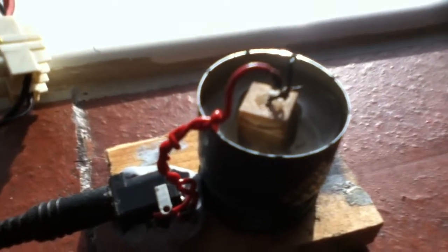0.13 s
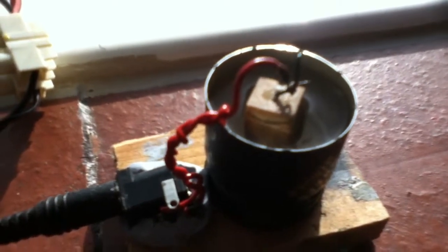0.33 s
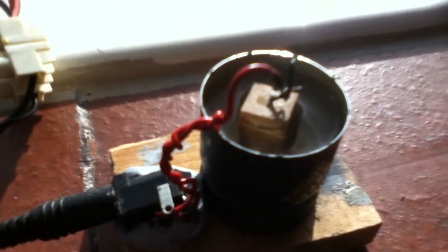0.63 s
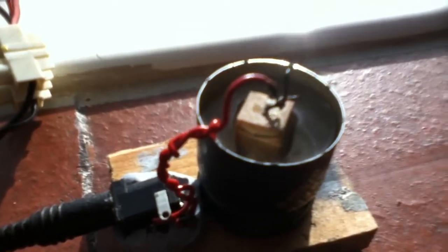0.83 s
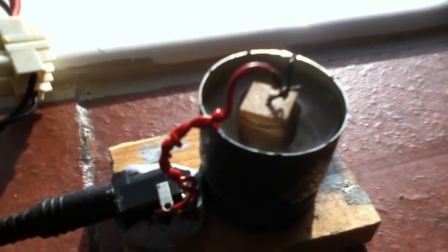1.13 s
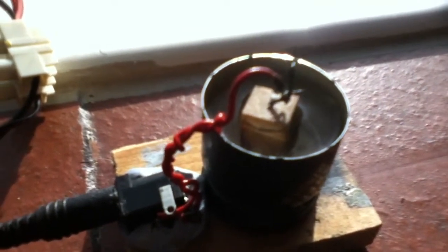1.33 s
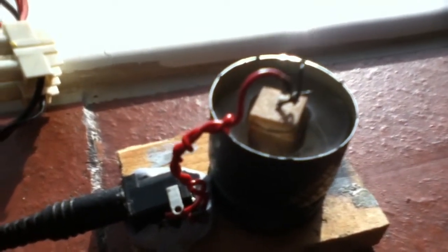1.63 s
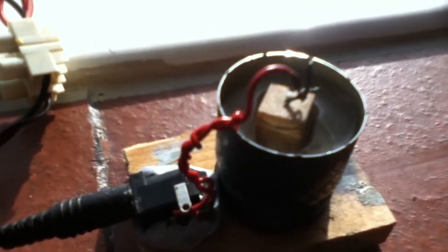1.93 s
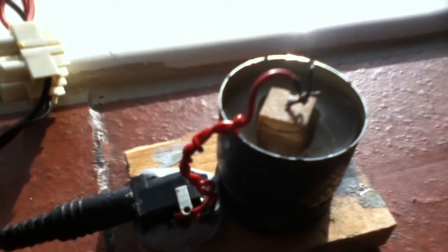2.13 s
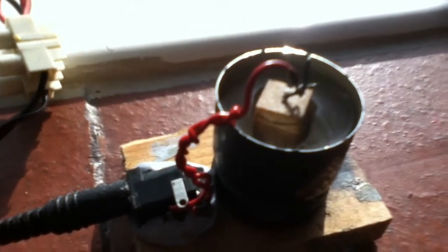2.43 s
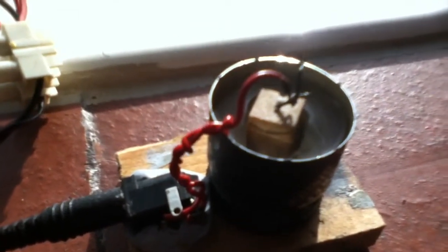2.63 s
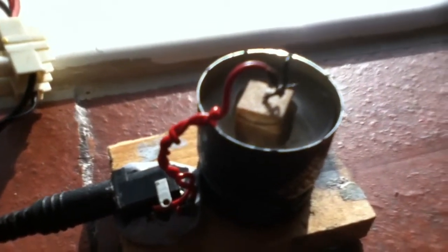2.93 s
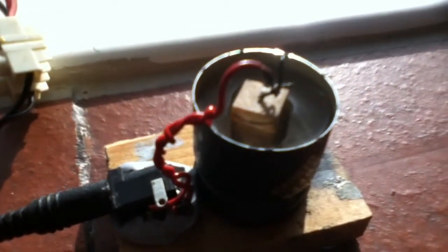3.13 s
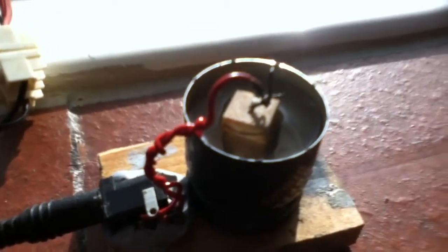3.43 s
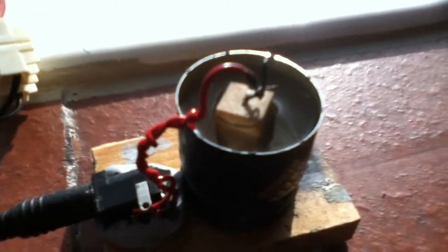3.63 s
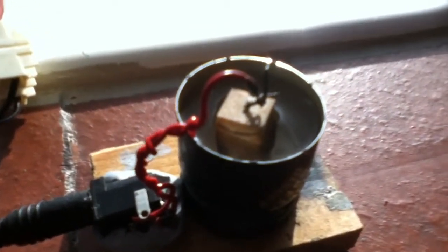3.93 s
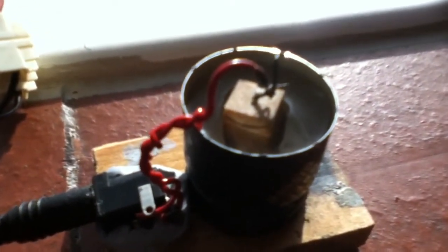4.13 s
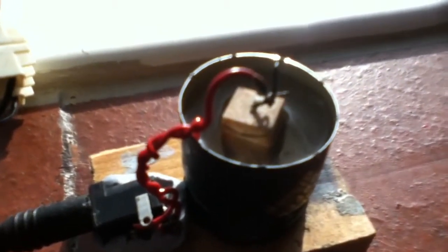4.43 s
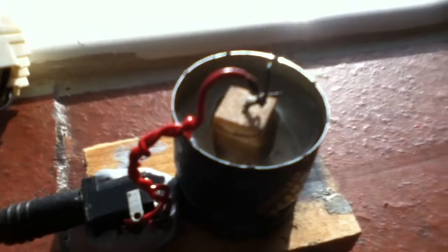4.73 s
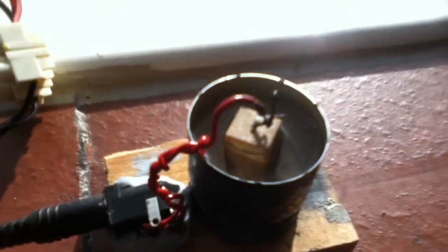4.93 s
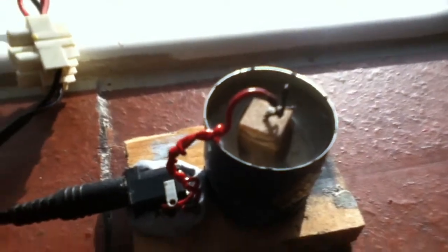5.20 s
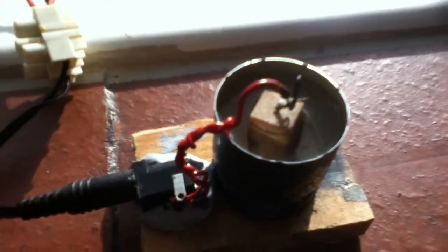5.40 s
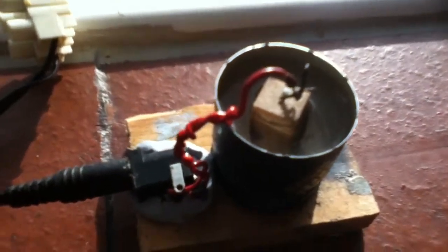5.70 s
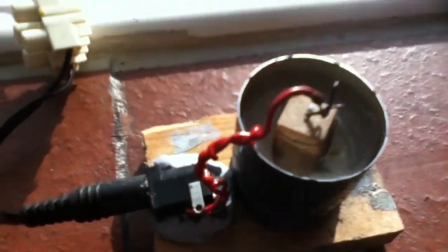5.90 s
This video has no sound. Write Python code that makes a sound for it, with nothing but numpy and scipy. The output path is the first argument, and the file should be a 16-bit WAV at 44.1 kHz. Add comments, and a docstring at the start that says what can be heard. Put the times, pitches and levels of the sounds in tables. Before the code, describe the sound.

Continuous hard boiling in a little metal cup: sizzling, spattering hiss, bright and nearly steady, strongest at the start. Bubbles snap quickly at first, then the crackle stops and unsteady steam whistles emerge, one rough and piercing, another much higher and slowly climbing. Late on they give way to breathy hiss, a brief swooping squeal and soft knocks on the wooden base. Close handheld microphone, short indoor reflections, very quiet low room murmur.

```python
"""Water boils hard around a wired heater in a small metal cup on a window sill, heard from close by.
Dense trains of tiny clicks, one per collapsing steam bubble, ring in the cup and make hiss, spatter and fizz.
Larger bubbles crackle and pop. Steam from narrow gaps sings in whistles and hiss: gliding tones in breathy noise.
Dull knocks ring the wooden base; soft low bumps, gurgles and handling rustle are swells of narrow noise.
The room rumbles faintly below."""
import sys
import numpy as np
from scipy import signal
from scipy.fft import rfft, irfft, next_fast_len
from scipy.io import wavfile
from scipy.ndimage import map_coordinates

SR = 44100
rng = np.random.default_rng(int(sys.argv[2]) if len(sys.argv) > 2 else 0)


def generate_wav(sig):
    """Save sig (samples, or channels by samples) to the path in sys.argv[1] as 16-bit PCM at SR."""
    pcm = np.round(np.clip(np.atleast_2d(sig).T, -1, 1) * 32767).astype(np.int16)
    wavfile.write(sys.argv[1], SR, pcm)


N = 267201
TIME, BINS = np.arange(N) / SR, np.fft.rfftfreq(N, 1 / SR)  # seconds, hertz

# How hard the water boils; only the height above CALM_DB counts. Each row: time in seconds, vigour in dB.
BOIL_VIGOUR = [(0, -58), (0.6, -60), (0.92, -61.5), (1.18, -62.5), (1.8, -62), (2.4, -62.5), (3.7, -61.5),
               (4.7, -60), (6.0, -60)]
CALM_DB = -63
# Brief surges of bubbling, negative for a slackening. Each row: start in seconds, length in seconds, change in dB.
BOIL_SURGES = [(.42, 0.14, 1.5), (.84, 0.12, 1), (1.5, 0.64, 0.5), (2.6, 0.34, 1), (3.36, 0.22, 0.2),
               (4.3, 0.45, 0.4), (5.06, 0.24, -1.8), (5.24, 0.14, 0), (5.72, 0.77, 0.9)]
# Resonances of the cup and its water. Each row: pitch in hertz, nominal width in hertz, relative level in dB.
CUP_RESONANCES = [(1425, 210, -18), (1744, 144, -13.5), (2096, 53, -17), (2516, 61, -15.5),
                  (2870, 260, -16.5), (3174, 61, -9), (3630, 145, -2.5), (3770, 150, -0.5),
                  (4076, 250, 1.5), (4420, 520, -0.5), (4960, 220, -1.5), (5230, 220, -3.5)]
# The sloshing water bends them: typical bend as a share of their pitch, and changes per second.
SLOSH, SLOSH_PER_S = 0.008, 3
# Colours of steam hiss, spatter and fizz. Each row: frequency in hertz, relative level in dB per hertz.
STEAM_COLOUR = [(3400.0, -45), (4800.0, -10), (5550.0, -3.5), (5900.0, -4.5), (6200.0, -0.5), (6550.0, -1),
                (7150.0, -0.5), (7600.0, -7.5), (8100.0, -3), (8550.0, -12.5), (10000.0, -5.5),
                (13000.0, -28.5)]
SPATTER_COLOUR = [(200.0, -10), (600.0, -6), (950.0, -5), (1300.0, -2.5), (1620.0, -3.5), (1950.0, -3.5),
                  (2330.0, -5.5), (2650.0, 1.5), (3400.0, -2.5), (5500.0, 1), (8800.0, 5.5), (11500.0, -1),
                  (13000.0, 1), (15000.0, -10.5)]
FIZZ_COLOUR = [(7000.0, -24), (9100.0, -25), (9900.0, -4.5), (10600.0, -1.5), (10950.0, 0.5), (11400.0, 2),
               (12100.0, 3), (12700.0, -4.5), (13500.0, -10), (15000.0, -15)]
# The steam hiss chokes for a moment. Each row: start in seconds, length in seconds, change in dB.
STEAM_CHOKES = [(2.44, 0.2, -3), (3.68, 0.32, -1)]
# The fizz thins towards the end. Each row: start in seconds, length in seconds, change in dB.
FIZZ_THINNING = [(5.0, 1.4, -1)]

# Colours of the crackle and of a single pop. Each row: frequency in hertz, relative level in dB per hertz.
CRACKLE_SPECTRUM = [(500, -37), (1200, -2), (1800, -14), (2400, -0.5), (4000, 1), (6500, 2.5), (8400, 10.5),
                    (11500, -9), (13200, 5), (15000, 5)]
POP_SPECTRUM = [(1500, -19), (3000, 1), (4200, 0), (8500, 0), (12500, -7), (15000, -14)]
# The loudest single pops. Each row: time in seconds, peak level in dB.
LOUD_POPS = [(.0372, -27), (.0449, -25), (.0555, -32), (.1018, -31), (.1359, -29.5), (.1986, -32),
             (.2375, -32), (.2643, -29.5), (.2836, -31), (.4337, -32), (.4675, -27), (.5332, -32),
             (.6792, -32), (.7597, -29), (.8379, -31), (.9058, -30), (.9187, -30.5), (5.3941, -31)]
# The crackle fades, then stops as the boil settles.
CRACKLE_DB, CRACKLE_FADE_DB_PER_S, CRACKLE_END_S, CRACKLE_RELEASE_S = -44, 1.5, 1.14, 0.2

# The main whistle, rocked by the sloshing water. Each row: time in seconds, pitch in hertz, level in dB.
MAIN_CURVE = [(.45, 5040, -58), (.7, 5120, -50), (.79, 4860, -54), (.86, 5040, -49), (.96, 5150, -54),
              (1.06, 4990, -54), (1.22, 5140, -53.5), (1.55, 5020, -56), (1.83, 5100, -48),
              (1.96, 4920, -50), (2.12, 5100, -50.5), (2.33, 5110, -54), (2.38, 4960, -49),
              (2.5, 4910, -51), (2.6, 5000, -50), (2.75, 5090, -50), (2.95, 5060, -49), (3.12, 4920, -51),
              (3.2, 5070, -51), (3.33, 4910, -49), (3.48, 5040, -48), (3.63, 5000, -59), (3.71, 5100, -51),
              (3.77, 4860, -48.5), (3.88, 5010, -49.5), (4.04, 5050, -49), (4.25, 4940, -48),
              (4.4, 4980, -49.5), (4.94, 4990, -50.5), (5.02, 4980, -63), (5.3, 4960, -59),
              (5.55, 5000, -61), (5.7, 5000, -66)]
# The high whistle climbs slowly, then breaks off. Each row: time in seconds, pitch in hertz, level in dB.
HIGH_CURVE = [(.7, 10550, -63), (1.35, 11000, -58), (1.85, 11170, -56), (2.35, 11400, -60),
              (2.7, 11430, -63), (2.95, 11560, -51), (3.25, 11600, -55), (3.42, 11750, -51.5),
              (4.1, 11780, -50)]
# As the main whistle dies, a thin one swoops down and rebounds.
# Each row: time in seconds, pitch in hertz, level in dB.
SWOOP_CURVE = [(5.08, 13230, -54), (5.17, 12650, -54), (5.25, 11760, -48), (5.3, 11800, -50),
               (5.345, 12450, -56), (5.39, 12700, -59), (5.46, 12530, -55), (5.51, 12300, -57),
               (5.56, 11900, -52), (5.65, 11700, -60)]
# Other whistles and breathy hiss swells, each one straight glide. Each row: start in seconds,
# length in seconds, first pitch in hertz, last pitch in hertz, level in dB, clear share from 0 to 1.
OTHER_WHISTLES = [(0, 0.74, 5260, 5270, -56, 0.3), (0.38, .45, 4080, 4130, -56, 0),
                  (.6, 1.3, 9810, 9900, -60, .55), (1.2, 0.35, 5310, 5310, -59, .45),
                  (1.55, 0.51, 4120, 4125, -57, .2), (2.0, 1.22, 10030, 10000, -58.5, 0.6),
                  (2.75, 1.6, 11950, 12070, -57, 0.2), (3.0, .5, 3180, 3143, -64.5, .3),
                  (4.08, .42, 11000, 11020, -51.5, 0.1), (4.482, .56, 11080, 11100, -52, .2),
                  (4.27, 0.49, 3290, 3300, -65, .3), (4.6, 0.58, 2964, 2965, -66, 0),
                  (3.331, 0.53, 7830, 7880, -58, 0.03), (3.36, .4, 11050, 10980, -57, .2),
                  (5.15, 0.4, 6730, 7100, -57, .1), (5.2, .13, 10750, 10650, -59, .6),
                  (5.23, .16, 4050, 4150, -51, .15), (5.33, .16, 11600, 11500, -65, .5),
                  (5.39, .14, 10560, 10540, -62, .6), (5.45, 0.683, 4200, 4220, -62, 0.2),
                  (5.531, 0.56, 7000, 7200, -50, 0.2), (5.56, 0.63, 5800, 5900, -54.5, 0.1),
                  (5.598, .55, 11150, 11150, -56, .1), (5.61, 0.41, 11730, 11760, -56, .4),
                  (5.74, .2, 12950, 12300, -56, .6)]
# Short squeaks of steam. Each row: start in seconds, length in seconds, first pitch in hertz,
# last pitch in hertz, level in dB.
STEAM_SQUEAKS = [(1.565, 0.045, 12100, 11200, -52), (1.62, .05, 12450, 12350, -54),
                 (1.685, .04, 12400, 11600, -52), (1.75, .05, 11700, 11200, -52),
                 (1.81, .055, 12100, 11300, -50), (2.385, 0.095, 12300, 11850, -52),
                 (2.71, 0.069, 12000, 11700, -55), (2.93, .08, 11650, 12000, -54),
                 (3.1, 0.037, 11800, 11900, -50), (5.03, 0.06, 12150, 11750, -53)]
SQUEAK_WIDTH_HZ = 200
# All whistles share the time to open or close, the breathy width, a slow waver and a fast jitter of the pitch.
OPEN_S, BREATHY_HZ = 0.048, 300
WAVER_HZ, WAVER_PER_S, JITTER_HZ, JITTER_PER_S = 25.07, 9, 55.5, 150
# Their clear core sputters: typical depth, and changes per second.
SPUTTER_DB, SPUTTER_PER_S = 0.2, 38
# Bubbles breaking from the main jet ring near its pitch; RINGS_SHARE is their share of its power.
RINGS_PER_S, RINGS_SHARE, RING_DECAY_S = 420, 0.37, 0.0079
RING_SCATTER_HZ, RING_GLIDE_HZ_PER_S = 85, 2300  # typical scatter, fastest glide up or down

# Soft knocks that reach the wooden base. Each row: time in seconds, level in dB before the base's own levels.
BASE_KNOCKS = [(4.788, -47), (4.809, -50.5), (5.2, -55), (5.226, -57), (5.269, -51), (5.355, -57),
               (5.502, -55)]
# What the base rings with. Each row: pitch in hertz, level in dB, time to fade by 60 dB in seconds.
BASE_MODES = [(134.3, -9, .25), (191, 5.5, 0.054), (237, -13, .08)]
KNOCK_RISE_S = 0.002
# Soft low bumps, gurgles and handling rustle. Each row: start in seconds, length in seconds, pitch in hertz,
# width in hertz, level in dB.
SOFT_BUMPS = [(.38, .3, 470, 90, -70), (.42, .16, 1330, 296, -66.5), (0.597, .12, 1150, 400, -70),
              (1.41, 0.4, 135, 90, -69), (1.603, 0.18, 1350, 300, -73), (1.72, 0.2, 700, 548, -69),
              (1.724, 0.18, 159.9, 140, -63.5), (2.6, 0.089, 1000, 400, -74), (2.74, 0.07, 1020, 400, -73),
              (4.628, 0.11, 175, 70.2, -65), (4.79, 0.093, 135.4, 35, -64), (5.275, 0.058, 425, 70, -62),
              (5.278, .05, 1000, 500, -67), (5.323, .09, 95, 50, -65.5), (5.36, 0.38, 420, 220, -67.5),
              (5.417, 0.35, 220.2, 130, -70), (5.46, 0.056, 1150, 400, -68), (5.523, 0.055, 455, 80, -64)]
# Colour of the room's rumble. Each row: frequency in hertz, relative level in dB per hertz.
RUMBLE_COLOUR = [(22, -15), (42, -17), (60, -2), (80, -3.5), (140, 1), (180, 0.5), (200, -1), (228, 1.5),
                 (290, -6), (460, -6.5), (560, -10.5), (750, -16), (1050, -20), (1800, -63)]
RUMBLE_DB = -61.5
# Reflections from the window recess. Each row: delay in seconds, level in dB.
WINDOW_ECHOES = [(.00423, -60), (.00662, -21.5), (0.0163, -24)]
# Narrow dips and peaks where reflections cancel or reinforce. Each row: frequency in hertz,
# distance in hertz at which the change has shrunk to about a third, change in dB.
REFLECTION_DIPS = [(3380, 67, 4), (4860, 58, 1), (6360, 55, -2), (7070, 81, -4.5), (11300, 44, -7)]
# The hand-held microphone drifts through the pattern of the room's tail.
DRIFT_PER_S = 3.1
# The microphone loses the highest treble. Each row: frequency in hertz, gain in dB.
MICROPHONE_COLOUR = [(11000, -0.5), (12280, -1), (12700, -9), (13050, -14), (13600, -11), (14500, -16)]
EDGE_HZ = 15400  # upper limit of the sound


def boil():
    """Bubbles ring the cup; steam, spatter and fizz leave its mouth, each following the vigour of the boil."""
    vigour_db = np.interp(TIME, *np.transpose(BOIL_VIGOUR)) - CALM_DB
    surge_db = swells(BOIL_SURGES)
    # a base level plus so many dB for each dB of vigour and of surge; fizz weakens as vigour grows
    ring_db = -48 + 0.24 * vigour_db + surge_db
    steam_db = -45.5 + 0.52 * vigour_db + 0.26 * surge_db + swells(STEAM_CHOKES)
    spatter_db = -53 + 1.55 * vigour_db + 0.2 * surge_db
    fizz_db = -48 - 0.42 * vigour_db + 0.43 * surge_db + swells(FIZZ_THINNING)

    ring = bubbles(cup_gain(), per_s=40000, spread_db=0.5, surge_db=0.25, surge_per_s=20)
    steam = bubbles(colour(STEAM_COLOUR), per_s=90000, spread_db=0.3, surge_db=0.4, surge_per_s=20)
    spatter = bubbles(colour(SPATTER_COLOUR), per_s=90000, spread_db=0.5, surge_db=0.7, surge_per_s=16)
    fizz = bubbles(colour(FIZZ_COLOUR), per_s=70000, spread_db=0.2, surge_db=0.5, surge_per_s=14)
    out = amp(ring_db) * sloshed(ring) + amp(steam_db) * steam
    return out + amp(spatter_db) * spatter + amp(fizz_db) * fizz


def cup_gain():
    """The cup answers most strongly at its resonances, whose powers add up."""
    power = np.zeros(len(BINS))
    for hz, width, db in CUP_RESONANCES:
        # half the amplitude is left at 0.64 widths from the centre
        peak = amp(db) / (1 + ((BINS - hz) / (0.64 * width)) ** 2)
        power += peak ** 2
    return np.sqrt(power)


def bubbles(gain, per_s, spread_db, surge_db, surge_per_s):
    """A train of collapse clicks, per_s a second, of uneven size, coming in surges, in one colour; rms 1."""
    count = rng.poisson(per_s / SR, N)
    size = amp(spread_db * np.minimum(rng.exponential(1, N), 4))
    clicks = np.sqrt(count) * size * rng.standard_normal(N)
    surging = clicks * amp(surge_db * wander(surge_per_s))
    return evened(filtered(surging, gain))


def sloshed(x):
    """Sloshing water bends all pitches of a sound slowly up and down."""
    place = np.arange(N) + np.cumsum(SLOSH * wander(SLOSH_PER_S))
    return map_coordinates(x, [place], order=3, mode="mirror")


def crackle():
    """Larger bubbles collapse one by one with a sharp, bright snap."""
    release = np.clip((CRACKLE_END_S - TIME) / CRACKLE_RELEASE_S, 0, 1)
    level = amp(CRACKLE_DB - CRACKLE_FADE_DB_PER_S * TIME) * release
    sparse = bubbles(colour(CRACKLE_SPECTRUM), per_s=1700, spread_db=0.7, surge_db=0, surge_per_s=30)
    s, peak_db = np.transpose(LOUD_POPS)
    clicks = np.bincount(np.round(s * SR).astype(int), amp(peak_db), N)
    snap = colour(POP_SPECTRUM)
    snap = snap / irfft(snap, N)[0]  # a click of height 1 keeps its peak
    return level * sparse + filtered(clicks, snap)


def jets():
    """Steam jets: two lasting whistles, a swoop, other whistles and hiss swells, and squeaks from brief gaps."""
    out = main_jet() + whistle(HIGH_CURVE, clear=0.45) + whistle(SWOOP_CURVE, clear=0.45)
    for s, length, first_hz, last_hz, db, clear in OTHER_WHISTLES:
        out += whistle([(s, first_hz, db), (s + length, last_hz, db)], clear)
    for s, length, first_hz, last_hz, db in STEAM_SQUEAKS:
        glide = np.interp(TIME, [s, s + length], [first_hz, last_hz])
        out += amp(db) * burst(s, length, glide, SQUEAK_WIDTH_HZ)
    return out


def main_jet():
    """The main whistle is rough: a thin tone among brief, overlapping bubble rings scattered around its pitch."""
    s, pitch_hz, db = np.transpose(MAIN_CURVE)
    span = s[-1] - s[0]
    t, rings = TIME[:SR // 16], np.zeros(N)
    for place, size, phase, detune, glide in rng.random((int(RINGS_PER_S * span), 5)):
        start = s[0] + place * span
        # the root of 12 turns an even draw into one with a typical spread of 1
        scatter = RING_SCATTER_HZ * np.sqrt(12) * (detune - 0.5)
        hz = np.interp(start, s, pitch_hz) + scatter + RING_GLIDE_HZ_PER_S * (2 * glide - 1) * t
        envelope = (0.5 + size) * t * np.exp(-t / RING_DECAY_S)
        add(rings, start, envelope * np.sin(2 * np.pi * (np.cumsum(hz) / SR + phase)))
    rings = evened(rings) * np.sqrt(span / TIME[-1]) * amp(np.interp(TIME, s, db))
    tone = whistle(MAIN_CURVE, clear=0.68)
    return np.sqrt(RINGS_SHARE) * rings + np.sqrt(1 - RINGS_SHARE) * tone


def whistle(curve, clear):
    """A steam jet sings along a curve: a sputtering core (share clear of the power) in a breathy band."""
    s, pitch_hz, db = np.transpose(curve)
    hz = np.interp(TIME, s, pitch_hz) + WAVER_HZ * wander(WAVER_PER_S)
    gate = np.clip(np.minimum(TIME - s[0], s[-1] - TIME) / OPEN_S, 0, 1)
    core_hz = hz + JITTER_HZ * wander(JITTER_PER_S)
    sputter = amp(SPUTTER_DB * wander(SPUTTER_PER_S))
    core = evened(sputter * np.sin(2 * np.pi * np.cumsum(core_hz) / SR))
    breath = narrow_noise(hz, BREATHY_HZ)
    voice = np.sqrt(clear) * core + np.sqrt(1 - clear) * breath
    return gate * amp(np.interp(TIME, s, db)) * voice


def knocks():
    """Dull knocks ring the low modes of the wooden base, each a fading sine."""
    t, out = TIME[:SR // 2], np.zeros(N)
    modes = sum(amp(db) * np.exp(-np.log(1000) * t / t60) * np.sin(2 * np.pi * hz * t)
                for hz, db, t60 in BASE_MODES)
    thud = np.minimum(t / KNOCK_RISE_S, 1) * modes
    for s, db in BASE_KNOCKS:
        add(out, s, amp(db) * thud)
    return out


def bumps():
    """Soft low bumps, gurgles and handling rustle, each a swell of narrow noise."""
    return sum(amp(db) * burst(s, length, hz, width) for s, length, hz, width, db in SOFT_BUMPS)


def rumble():
    """The low murmur of the room: steady noise in one colour."""
    return amp(RUMBLE_DB) * evened(filtered(rng.standard_normal(N), colour(RUMBLE_COLOUR)))


def surroundings(x, wet_db, t60):
    """The direct path, the first echoes and a short diffuse tail that changes as the microphone drifts."""
    # a delay turns the phase in proportion to frequency
    echoes = sum(amp(db) * np.exp(-2j * np.pi * BINS * delay) for delay, db in WINDOW_ECHOES)
    dips = amp(sum(db * np.exp(-((BINS - hz) / width) ** 2) for hz, width, db in REFLECTION_DIPS))
    # three fading noise tails, blended in ever-changing shares
    tails = rng.standard_normal((3, N)) * np.exp(-np.log(1000) * TIME / t60) * (TIME > 0.006)
    blend = np.array([wander(DRIFT_PER_S) for tail in tails])
    wet = np.array([filtered(x, dips * rfft(tail / np.linalg.norm(tail))) for tail in tails])
    diffuse = (wet * blend).sum(0) / np.linalg.norm(blend, axis=0)
    return filtered(x, dips * (1 + echoes)) + amp(wet_db) * diffuse


def burst(s, length, hz, width_hz):
    """A short swell of narrow noise, rms 1 over its length."""
    return evened(swell(s, length) * narrow_noise(hz, width_hz)) * np.sqrt(length / TIME[-1])


def narrow_noise(hz, width_hz):
    """Turbulence in one resonance that follows the pitch hz; width_hz is measured at half amplitude."""
    turn = np.exp(2j * np.pi * np.cumsum(hz * np.ones(N)) / SR)
    drift = wander(width_hz / 2) + 1j * wander(width_hz / 2)
    return evened((turn * drift).real)


def wander(per_s):
    """Smooth chance of rms 1, mostly slower than per_s changes a second."""
    size = next_fast_len(N // 8, True)  # drawn coarsely, then joined by straight lines
    hz = np.fft.rfftfreq(size, TIME[-1] / size)
    coarse = irfft(rfft(rng.standard_normal(size)) / (1 + (hz / per_s) ** 2), size)
    return evened(np.interp(TIME, np.linspace(0, TIME[-1], size), coarse))


def swell(s, length):
    """A smooth rise and fall from 0 to 1 and back."""
    return np.sin(np.pi * np.clip((TIME - s) / length, 0, 1))


def swells(rows):
    """A level in dB that rises or dips smoothly once for each row."""
    return sum(db * swell(s, length) for s, length, db in rows)


def add(mix, s, sound):
    """Mixes a sound in at time s."""
    part = mix[max(round(s * SR), 0):][:len(sound)]
    part += sound[:len(part)]


def colour(points):
    """Gain at every frequency from a short spectrum."""
    hz, db = np.transpose(points)
    return amp(np.interp(np.log(BINS + 1), np.log(hz), db))


def filtered(x, gain):
    """Applies a gain per frequency."""
    return irfft(rfft(x) * gain, N)


def evened(x):
    """Scales to rms 1."""
    return x / np.sqrt(np.mean(x ** 2) + 1e-20)


def amp(db):
    """Decibels to gain."""
    return 10 ** (np.asarray(db) / 20)


def scene():
    """The cup, its echoes and the room reach one microphone, the same in both channels."""
    cup = surroundings(boil() + crackle() + jets(), wet_db=-17, t60=0.061)
    return np.tile(cup + knocks() + bumps() + rumble(), (2, 1))


def record(dry):
    """Microphone colour, then a steep cut above the upper limit."""
    heard = filtered(dry, colour(MICROPHONE_COLOUR))
    low_pass = signal.firwin(511, EDGE_HZ, window=("kaiser", 9), fs=SR)
    return signal.oaconvolve(heard, low_pass[None], "same", axes=1)


dry = scene()
out = record(dry)
generate_wav(out)
```